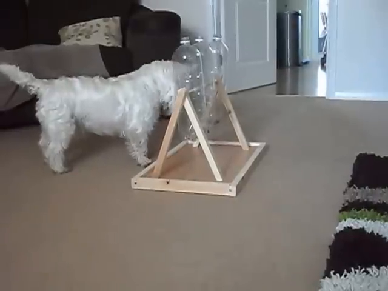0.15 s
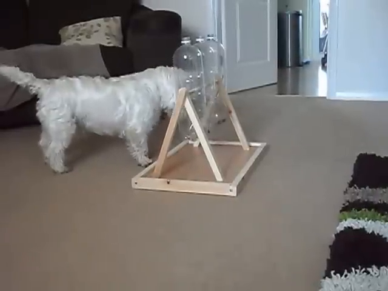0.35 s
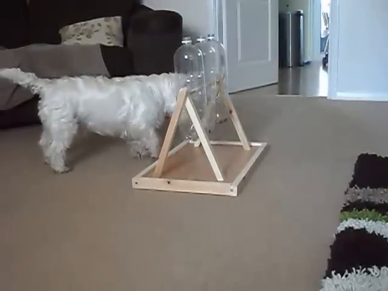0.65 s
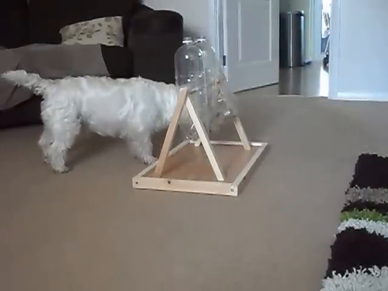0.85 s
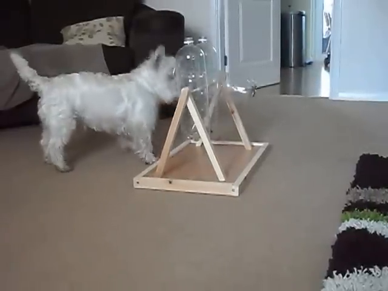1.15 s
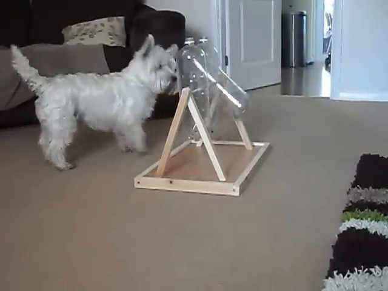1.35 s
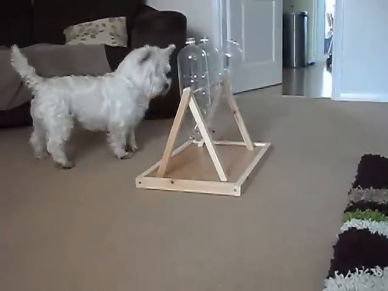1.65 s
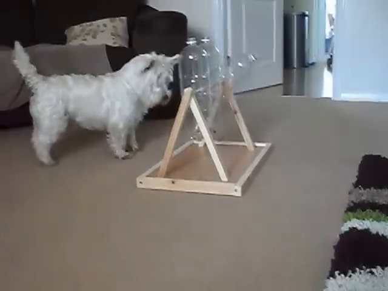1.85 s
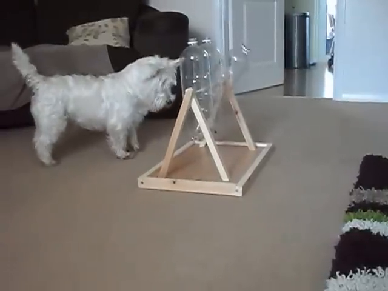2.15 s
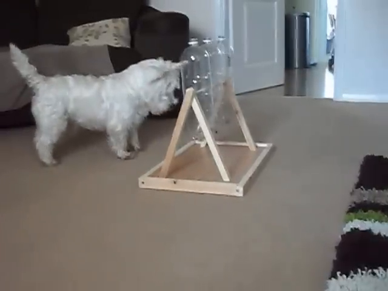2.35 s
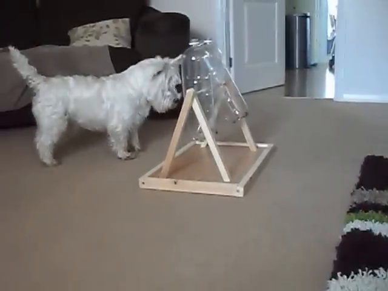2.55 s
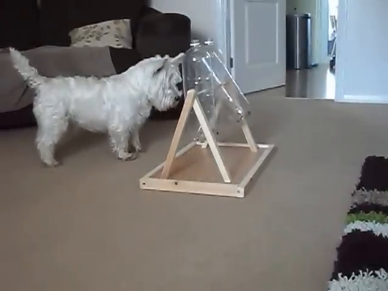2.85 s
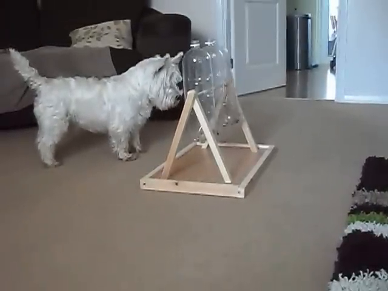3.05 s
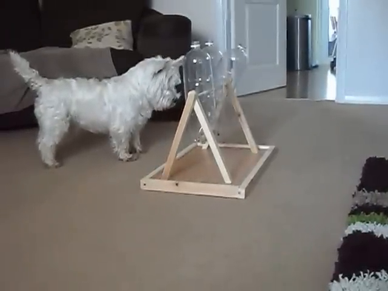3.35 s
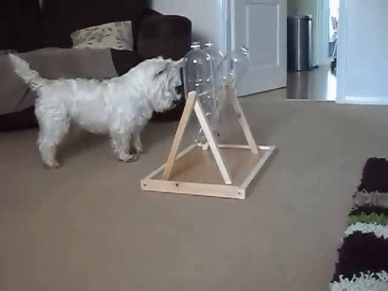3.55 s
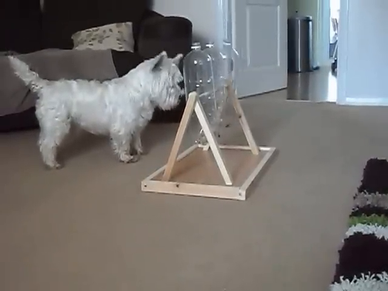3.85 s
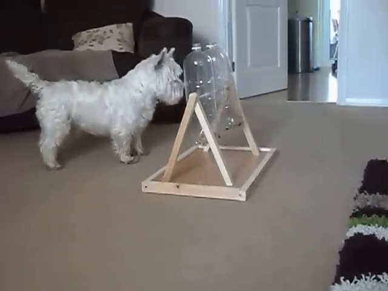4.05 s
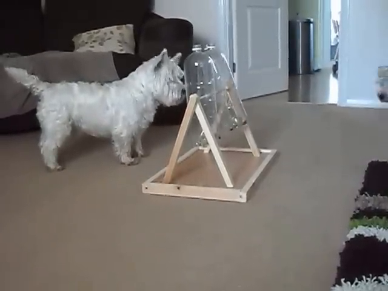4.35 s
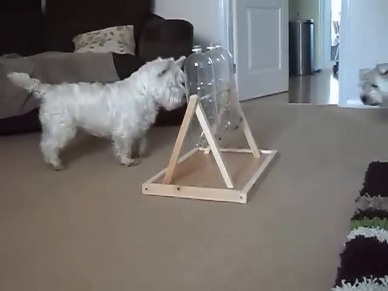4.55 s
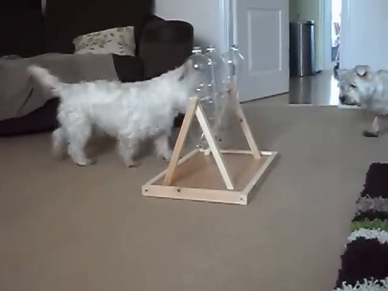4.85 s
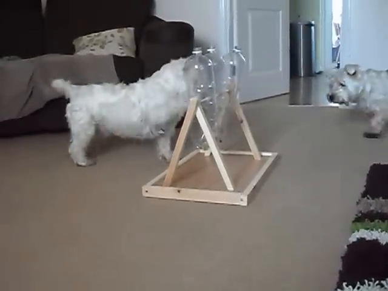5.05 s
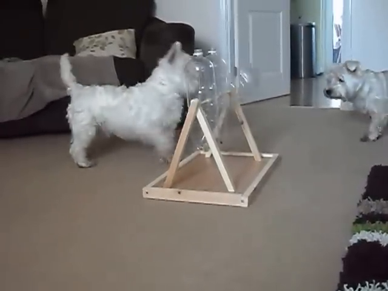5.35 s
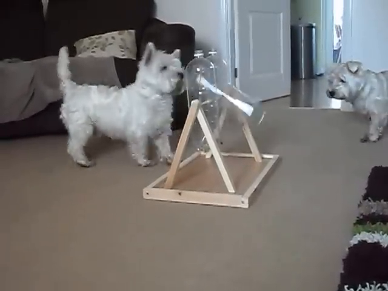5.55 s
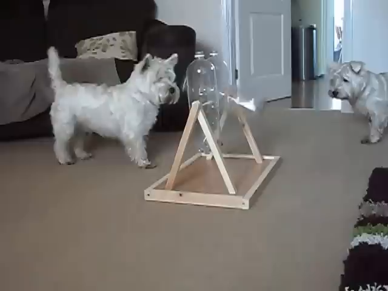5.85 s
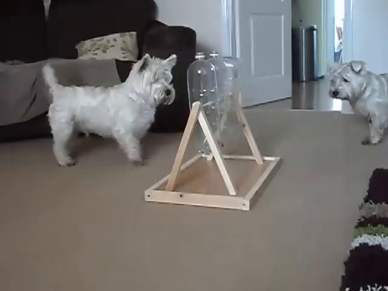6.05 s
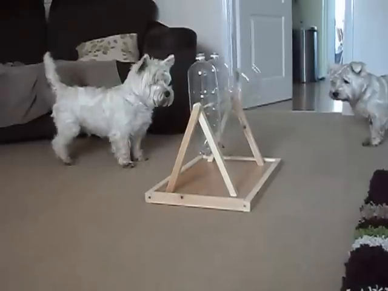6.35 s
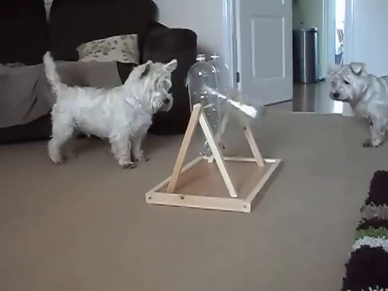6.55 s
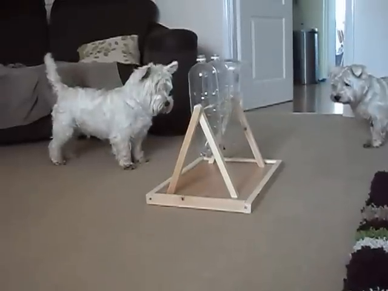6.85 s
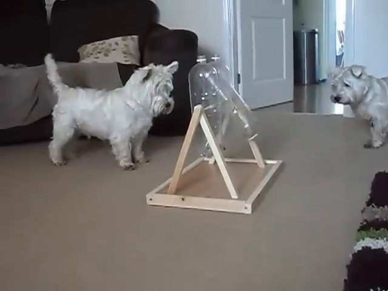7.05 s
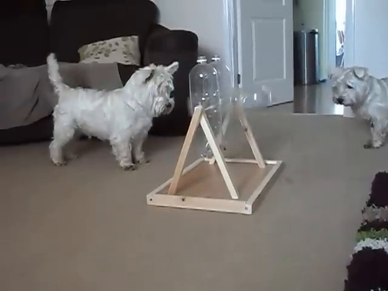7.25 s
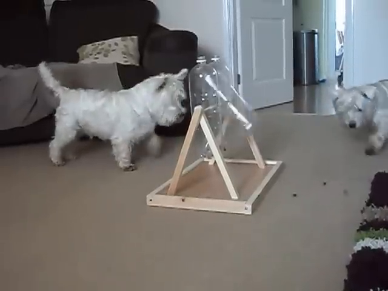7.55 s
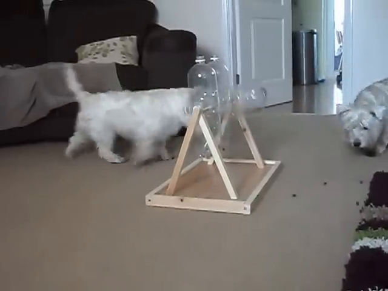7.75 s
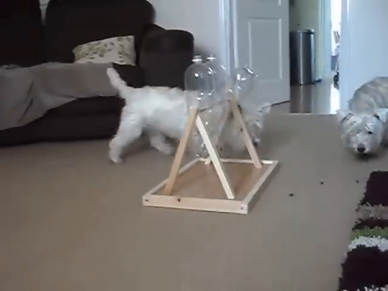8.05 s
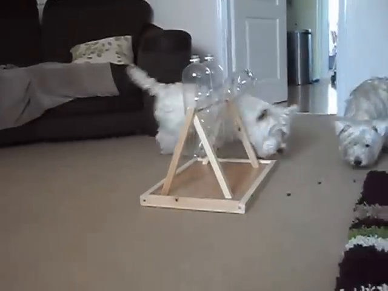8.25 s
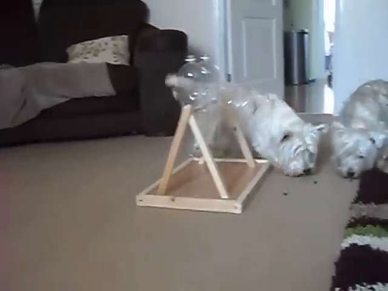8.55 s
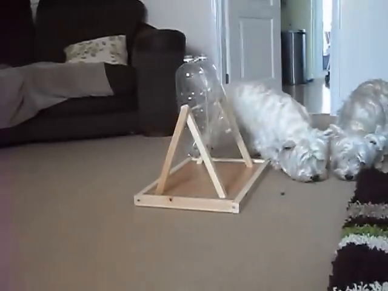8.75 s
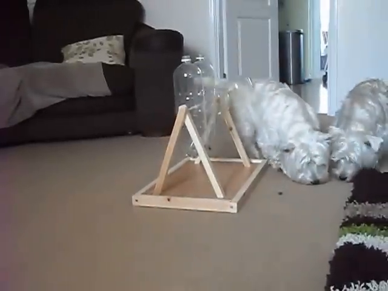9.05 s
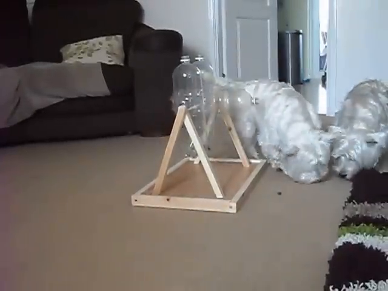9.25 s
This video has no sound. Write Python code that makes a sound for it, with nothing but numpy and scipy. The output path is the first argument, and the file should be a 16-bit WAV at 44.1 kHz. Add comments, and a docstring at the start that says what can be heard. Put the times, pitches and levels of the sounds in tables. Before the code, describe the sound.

A fast low electrical throb, soft hiss and very thin high whine run throughout, from a small camera in a carpeted living room. Tiny close clicks come at 0.1 s. From 0.85 to 1.15 s a dog pushes hollow plastic bottles: clustered dull knocks and wooden thumps with light claw rasp and soft brushing. Treats rattle and land at 1.3 and 1.55 s, then slide again near 2.1 s with a faint rub on the rod. A bottle swings back at 2.5 s; a sharp, loud case click snaps at 3.58 s; another hollow swing knocks at 4.06 s. Harder pushes, scrapes and rattling fill 5.15-5.6 s, with brushing to about 6 s. Ringing swings follow at 5.85 and 6.2-6.55 s. The strongest knocks, scrapes and hard treat clacks burst at 7.0-7.1 s, then a hollow knock at 7.55 s. Quiet brushing and weak bumps come at 8.6-9.1 s.

```python
"""Throughout there is a 30 Hz electrical throb with hiss and a thin whine, from a small camera in a carpeted room.
It is shaped noise, pulses and steady tones; a few close clicks of the camera case are short ringing blows.
Over it a dog paws at hollow plastic bottles with a few treats inside, which swing on a rod in a wooden frame.
Bursts of contact ring the bottles, claws scrape in dense tiny slips, and treats tumble and spill with hard clacks.
Soft noise that swells and fades is the brushing of paws on carpet and of bottles on their rod."""
import sys
import numpy as np
from scipy import signal
from scipy.fft import rfft, irfft, next_fast_len
from scipy.io import wavfile
from scipy.ndimage import map_coordinates

SR = 44100
rng = np.random.default_rng(int(sys.argv[2]) if len(sys.argv) > 2 else 0)


def transcribe(signal):
    """Save signal, clipped to [-1, 1], as a 16-bit WAV file at the path in sys.argv[1]."""
    frames = np.atleast_2d(signal).T
    limited = np.clip(frames, -1, 1)
    pcm = np.round(limited * 32767).astype(np.int16)
    wavfile.write(sys.argv[1], SR, pcm)


N = 414540
SPAN = 32768  # samples in one event
HZ = np.fft.rfftfreq(SPAN, 1 / SR)
TIME = np.arange(N) / SR

# room rumble and hiss, relative shape: [f/Hz, level/dB per Hz]
ROOM_NOISE = [(15, 29), (45, 28), (100, 26), (200, 12), (400, 8), (800, 3.5), (1600, 1), (3200, -2),
              (6000, -4.5), (8000, 0.5), (11000, -7)]
# how long echoes take to die away by 60 dB: [f/Hz, t/s]
ROOM_DECAY = [(150, 1), (400, 0.6), (1200, 0.54), (2800, 0.38), (6000, 0.32), (10000, 0.24)]
# the camera's low flutter and high fizz, relative shapes: [f/Hz, level/dB per Hz]
FLUTTER_NOISE = [(15, -11.5), (60, 2.5), (130, -5.5), (250, -12.5), (500, -22), (1200, -32.5), (5000, -69)]
FIZZ_NOISE = [(3000, -35), (6500, -17), (7500, -6.5), (8100, 0.5), (8550, -10), (9000, 0), (9600, -7.5),
              (10700, -5.5)]
# steady tones of the whine: [f/Hz, level/dB]
WHINE_TONES = [(7140, -62.5), (7854, -94), (7881, -91), (9001, -83)]
# clicks of the camera case: [t/s, level/dB, brightness/dB per octave, emphasis of the 4 kHz ring/dB]
CASE_CLICKS = [(0.093, -63.5, 1, 7), (0.1425, -60.5, 16, 8), (2.43, -49.5, 1, 22), (3.561, -54.5, 18, 2),
               (3.5789, -28, 8.5, -30), (3.5796, -36.5, 12.5, -30), (3.636, -56, 2, -18),
               (3.746, -59, 2, 10)]
# resonances of the camera case: [f/Hz, width/Hz, relative level/dB]
CASE_MODES = [(1830, 106, 9.5), (3160, 240, 5.5), (3850, 115, 10), (4330, 180, 3), (4930, 140, 4.5),
              (6130, 170, 3), (6730, 180, 0.5), (8160, 300, -8), (9530, 280, -13)]

# soft brushing, paws on the carpet and bottles rubbing faintly on their rod: [start t/s, length t/s, level/dB]
BRUSHING_BOUTS = [(0.9, 1.1, -57.5), (3.104, 0.09, -60.5), (5.356, 0.626, -51), (6.17, 0.45, -52.5),
                  (7.245, 0.61, -55.5), (8.56, 0.35, -54.5)]
BOUT_RISE_DB_PER_S, BOUT_FALL_DB_PER_S = 86, 46
# colour of the soft brushing, relative shape: [f/Hz, level/dB per Hz]
BRUSHING_NOISE = [(70, -33), (150, 3), (230, 5), (360, -16), (480, -1.5), (720, -8), (1100, -12.5),
                  (3000, -19), (6000, -25.5), (11000, -44)]

# a turning bottle rubs on its rod: [t/s, level/dB, pitch f/Hz]
ROD_RUBS = [(2.05, -53, 3870), (2.167, -57, 4540), (4.15, -63, 3850)]
RUB_WIDTH_HZ, RUB_S = 650, 0.12
# short separate claw scrapes, of differing pitch and length: [t/s, level/dB, centre f/Hz, width/Hz, length t/s]
CLAW_SCRAPES = [(5.232, -42.5, 2920, 2960, 0.05), (5.257, -42, 4600, 5000, 0.0091),
                (6.287, -52, 4000, 4500, 0.024), (6.988, -47, 4500, 4500, 0.049),
                (7.041, -42, 7500, 2800, 0.042)]
CLAW_DB = -14  # light rasp under each push, relative to the push
RASP_HZ, RASP_WIDTH_HZ = 4300, 3600  # light slipping on the plastic

# the swinging bottle throws its treats out with a hard clack and a rebound: [t/s, level/dB]
NECK_CLACKS = [(7.0893, -35.5), (7.097, -34.5), (7.101, -31), (7.125, -45)]
# resonances of the stiff bottle neck: [f/Hz, width/Hz, relative level/dB]
NECK_MODES = [(1560, 190, -10), (2160, 160, -1.5), (2560, 310, -1), (2900, 230, -2), (3600, 890, -9),
              (3820, 220, -2), (4270, 1200, -12.5), (5730, 370, -7), (6660, 900, -17.5)]
# treats slide down a tipping bottle and land:
# [landing t/s, landing level/dB, time on the way t/s, slide level/dB, wall pitch f/Hz]
TREAT_TUMBLES = [(1.328, -41.5, 0.064, -43.5, 1380), (1.557, -42, 0.012, -59, 1520),
                 (2.134, -48, 0.11, -45.5, 1220), (5.256, -45, 0.018, -42.5, 1570),
                 (6.288, -38, 0.037, -45, 1340), (7.094, -43, 0.047, -39.5, 1360)]
SLIDE_SHARE, LANDING_S = 0.64, 0.01  # sliding lasts this share of the way; length of the landing
SETTLE_AFTER_S, SETTLE_DB, SETTLE_S = 0.1, -14, 0.013  # last pieces, relative to the landing
TREAT_HOLLOW_DB, TREAT_RASP_DB = -1, -11.5  # rasp is relative to the slide

# paw, muzzle or flank pushes a bottle: [t/s, bottle level/dB, weight: frame thump over the bottle/dB]
BOTTLE_PUSHES = [(0.851, -42, 4), (0.915, -46.5, 7), (0.961, -52, 9), (1.096, -43, -13.5),
                 (1.135, -44.5, 1.5), (1.915, -53.5, 5), (5.157, -45.5, -2.5), (5.177, -39.5, 2.5),
                 (5.272, -37.5, 1.5), (5.545, -44.5, -0.5), (5.6, -51, 0), (6.977, -36, -4.5),
                 (7.009, -36, -3.5), (8.7, -54.5, 8.5), (8.835, -53, 0), (9.104, -48.5, 0)]
PUSH_CONTACT_S, PUSH_HOLLOW_DB = 0.022, -0.5  # contact time at weight 0; a touch damps the hollow note
# a free bottle swings back against the frame: [t/s, bottle level/dB, weight: frame thump over the bottle/dB]
FREE_SWINGS = [(2.502, -46, 1), (4.059, -47.5, -1.5), (5.841, -40, -1), (6.164, -52.5, 3),
               (6.443, -51.5, 5.5), (6.541, -42.5, 1.5), (7.563, -40.5, -3)]
SWING_CONTACT_S, SWING_HOLLOW_DB = 0.011, 8.5  # contact time at weight 0; a free bottle rings out
# brightness in dB per octave at weight 0; its loss, and the growth of contact time, per dB of weight
BRIGHT_DB, DULL_PER_DB, LONGER_PER_DB = -1.4, 0.04, 0.07
# bottle resonances, then its hollow note: [f/Hz, width/Hz, relative level/dB]
BOTTLE_MODES = [(333, 64, -4.5), (594, 222, -7), (698, 100, -1.5), (990, 320, -14.5), (1230, 370, -11.5),
                (1790, 190, -16), (2125, 74, -14), (2540, 200, -16.5), (3660, 320, -18)]
HOLLOW_MODE = [(587, 40, -3)]
# broad ring of the bottle wall, before a 22 dB cut: [f/Hz, relative level/dB]
WALL_RING = [(100, 8.5), (300, -33), (700, -31), (1500, -3), (3000, -5), (5000, -20), (11000, -29)]
# response of the wooden frame: [f/Hz, relative level/dB]
FRAME_THUMP = [(50, -40.5), (110, -11), (170, 2), (240, -1.5), (400, -11.5), (800, -24.5), (3000, -31.5),
               (11000, -56)]


def amp(db):
    """Turn decibels into a gain."""
    return 10 ** (np.asarray(db) / 20)


def unit(x):
    """Scale a signal to an average strength (rms) of 1."""
    return x / np.sqrt(np.mean(x ** 2) + 1e-20)


def along(points, hz):
    """Read a table of frequencies and values in between its points, on a log axis."""
    f, v = np.transpose(points)
    return np.interp(np.log(hz + 1), np.log(f), v)


def filtered(x, response):
    """Strengthen or weaken each frequency of a signal by a given response."""
    m = next_fast_len(N + SPAN)
    hz = np.fft.rfftfreq(m, 1 / SR)
    return irfft(rfft(x, m) * response(hz), m)[:N]


def noise(spectrum):
    """Coloured noise of rms 1: random motion shaped by a spectrum."""
    return unit(filtered(rng.standard_normal(N), lambda hz: amp(along(spectrum, hz))))


def causal(gain):
    """Response with this gain that rings only after a blow, never before it."""
    cepstrum = irfft(np.log(np.maximum(gain, 1e-6)))
    fold = np.r_[1, np.full(SPAN // 2 - 1, 2), np.zeros(SPAN // 2)]  # moves all ringing after the blow
    return np.exp(rfft(cepstrum * fold))


def resonances(modes):
    """Response of a body that vibrates in these modes; a wider mode dies away sooner."""
    total = 0
    for k, (centre, width, db) in enumerate(modes):
        damping = 1j * HZ * width
        total = total + (-1) ** k * amp(db) * damping / (centre * centre - HZ ** 2 + damping)
    return total


def tilt(slope_db):
    """Brightness of a contact: a slope in dB per octave above 500 Hz."""
    return causal(amp(slope_db * np.log2(np.maximum(HZ, 500) / 500)))


def contacts(length, rate, rest_db):
    """Spectrum of a firm first touch followed by a fading run of random touches, rate per second."""
    t = np.arange(SPAN) / SR
    happens = rng.random(SPAN) < rate / SR
    touches = happens * rng.standard_normal(SPAN) * amp(rest_db) * np.exp(-(t / length) ** 4)
    touches[0] = 1
    return rfft(touches)


def room(direct_db):
    """Response from a new spot: direct sound, a cluster of first wall echoes, then a weaker diffuse tail."""
    hz, t, z = signal.stft(rng.standard_normal(SPAN), SR, nperseg=256)
    first_echoes = 1 + 0.43 * np.exp(-(t / 0.06) ** 4)
    decay = amp(-60 * t / along(ROOM_DECAY, hz)[:, None]) * first_echoes
    echoes = signal.istft(z * decay, SR, nperseg=256)[1]
    tail = np.r_[np.zeros(SR // 500), echoes][:SPAN]  # echoes start 2 ms late
    return amp(direct_db) + rfft(tail / np.linalg.norm(tail))


def rasp(centre_hz, width_hz, length):
    """Spectrum of dense tiny slips on plastic, gathered around one frequency."""
    slips = contacts(length, rate=2100, rest_db=9)
    return slips * resonances([(centre_hz, width_hz, 0)]) * room(direct_db=0)


def add(track, s, db, spectrum):
    """Mix in one event; its level is its energy spread over a twentieth of a second."""
    sound, start = irfft(spectrum), round(s * SR)
    scaled = amp(db) * np.sqrt(SR / 20) * sound / np.linalg.norm(sound)
    track[start:start + SPAN] += scaled[:N - start]


def room_floor():
    """Faint rumble and hiss of the room, as steady coloured noise."""
    return amp(-49.0) * noise(ROOM_NOISE)


def whine():
    """A few steady pure tones make the thin electrical whine."""
    return np.sqrt(2) * sum(amp(db) * np.sin(2 * np.pi * hz * TIME) for hz, db in WHINE_TONES)


def electronics():
    """The camera draws current once per picture: a soft pulse that carries low flutter and high fizz."""
    phase = TIME * 30 % 1  # 30 pictures a second
    switch_on = np.tanh((phase - .18) / 0.061)
    switch_off = np.tanh((phase - .535) / 0.084)
    busy = (switch_on - switch_off) / 2
    throb = unit(filtered(busy, lambda hz: 1j * hz / (6 + 1j * hz)))  # removes the steady part
    carried = amp(-44) * noise(FLUTTER_NOISE) + amp(-54.0) * noise(FIZZ_NOISE)
    return amp(-39) * throb + busy * carried


def case_clicks():
    """The case clicks right at the microphone, so the room barely answers."""
    out = np.zeros(N)
    case = resonances(CASE_MODES) * causal(HZ ** 2 / (HZ ** 2 + 1800 ** 2))  # little bass
    for s, db, bright_db, ring_db in CASE_CLICKS:
        ring = 1.5 + resonances([(4130, 280, ring_db)])
        add(out, s, db, case * ring * tilt(bright_db) * room(direct_db=23.5))
    return out


def soft_brushing():
    """Paws on the carpet and bottles on their rod rub softly in bouts that swell, hold and fade unevenly."""
    power = np.zeros(N)
    for s, length, db in BRUSHING_BOUTS:
        rise_db = BOUT_RISE_DB_PER_S * np.maximum(s - TIME, 0)
        fall_db = BOUT_FALL_DB_PER_S * np.maximum(TIME - s - length, 0)
        power += amp(db - rise_db - fall_db) ** 2
    knots = TIME * 28  # small changes of pressure a second
    pressure = map_coordinates(rng.standard_normal(int(knots[-1]) + 4), [knots])
    return np.sqrt(power) * amp(2.7 * pressure) * noise(BRUSHING_NOISE)


def rod_rubs():
    """A bottle rubs on its rod in tiny slips that sound in a narrow band."""
    out = np.zeros(N)
    for s, db, pitch_hz in ROD_RUBS:
        add(out, s, db, rasp(pitch_hz, RUB_WIDTH_HZ, RUB_S))
    return out


def claw_scrapes():
    """Claws slip on the plastic, lightly with every push and in a few short separate scrapes."""
    out = np.zeros(N)
    for s, db, _ in BOTTLE_PUSHES:
        add(out, s, db + CLAW_DB, rasp(RASP_HZ, RASP_WIDTH_HZ, length=0.026))
    for s, db, centre_hz, width_hz, length in CLAW_SCRAPES:
        add(out, s, db, rasp(centre_hz, width_hz, length))
    return out


def clacks():
    """Quick hard hits ring the stiff neck of the bottle."""
    out = np.zeros(N)
    neck = resonances(NECK_MODES) * causal(1 / np.sqrt(1 + (HZ / 6800) ** 8))  # softens the top
    for s, db in NECK_CLACKS:
        add(out, s, db, contacts(0.0045, rate=1500, rest_db=-7.0) * neck * room(direct_db=-0.5))
    return out


def treats():
    """Hard little pieces slide, land and settle on the thin wall, which rings broadly over a hollow note."""
    out = np.zeros(N)
    for land_s, land_db, fall_s, slide_db, wall_hz in TREAT_TUMBLES:
        wall = resonances([(0.84 * wall_hz, 330, 0), (1.19 * wall_hz, 480, 0), (3400, 1500, -14)])
        hollow = resonances([(558, 220, TREAT_HOLLOW_DB)])
        body = causal(np.hypot(abs(wall), abs(hollow))) * tilt(-0.34)
        stages = [(land_s - fall_s, slide_db, SLIDE_SHARE * fall_s),
                  (land_s, land_db, LANDING_S),
                  (land_s + SETTLE_AFTER_S, land_db + SETTLE_DB, SETTLE_S)]
        for s, db, length in stages:
            add(out, s, db, contacts(length, rate=1100, rest_db=-6.5) * body * room(direct_db=-5.5))
        # the pieces rasp once they gather speed
        slipping = rasp(RASP_HZ, RASP_WIDTH_HZ, 0.8 * fall_s)
        add(out, land_s - 0.25 * fall_s, slide_db + TREAT_RASP_DB, slipping)
    return out


def knocks(rows, contact_s, hollow_db):
    """Each knock chatters, rings the bottle and thumps the frame; more weight makes it longer and duller."""
    out = np.zeros(N)
    wall_power = abs(resonances(BOTTLE_MODES)) ** 2 + amp(2 * (along(WALL_RING, HZ) - 22.0))
    hollow = amp(hollow_db) * abs(resonances(HOLLOW_MODE))
    bottle = causal(np.sqrt(wall_power + hollow ** 2))
    frame = causal(amp(along(FRAME_THUMP, HZ)))
    for s, db, weight_db in rows:
        length = contact_s * np.exp(LONGER_PER_DB * weight_db)
        blow = contacts(length, rate=1100, rest_db=0.5) * room(direct_db=-5.5)
        add(out, s, db, blow * bottle * tilt(BRIGHT_DB - DULL_PER_DB * weight_db))
        add(out, s, db + weight_db, blow * frame)
    return out


def scene():
    """Add the bottles, the dog and the camera over the faint rumble and hiss of the room."""
    background = room_floor() + whine() + electronics() + case_clicks()
    rubbing_and_treats = soft_brushing() + rod_rubs() + claw_scrapes() + clacks() + treats()
    pushed = knocks(BOTTLE_PUSHES, PUSH_CONTACT_S, PUSH_HOLLOW_DB)
    swinging = knocks(FREE_SWINGS, SWING_CONTACT_S, SWING_HOLLOW_DB)
    return (background + rubbing_and_treats + pushed + swinging)[None]


def record(dry):
    """The camera cuts steeply around 10750 Hz and keeps nothing from 11700 Hz up."""
    def band_limit(hz):
        return (hz < 11700) / np.sqrt(1 + (hz / 10750) ** 120)
    return filtered(dry[0], band_limit)[None]


dry = scene()
out = record(dry)
transcribe(out)
```